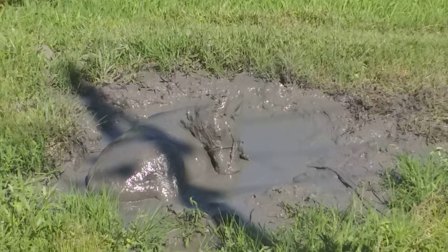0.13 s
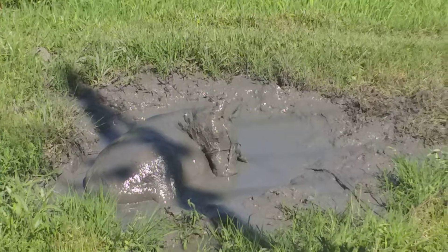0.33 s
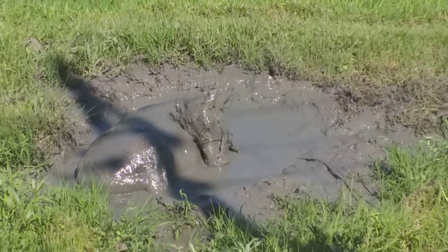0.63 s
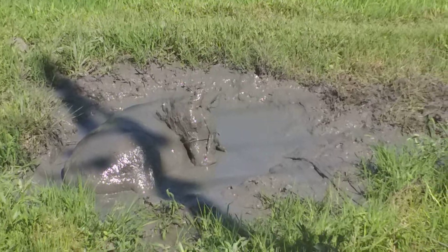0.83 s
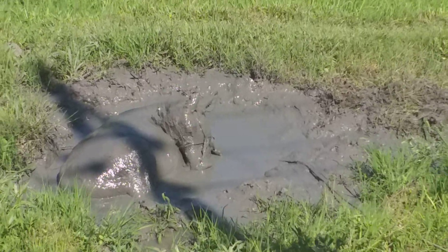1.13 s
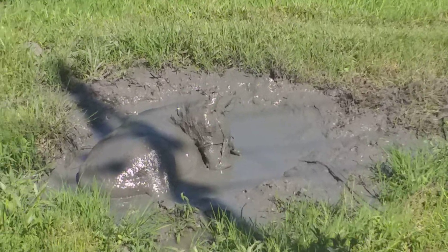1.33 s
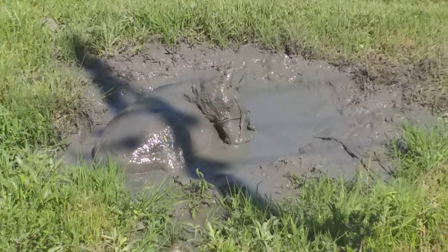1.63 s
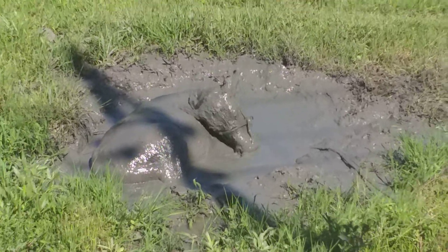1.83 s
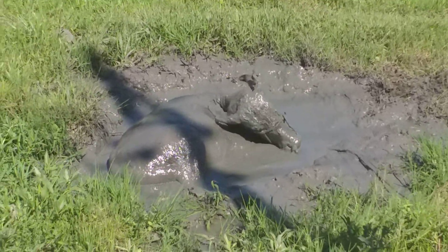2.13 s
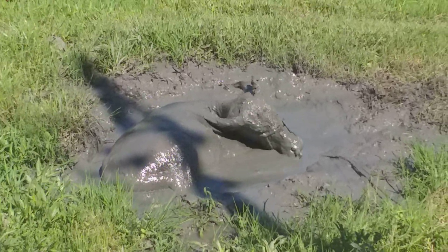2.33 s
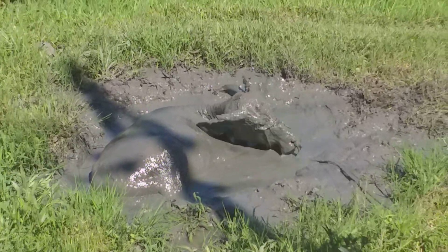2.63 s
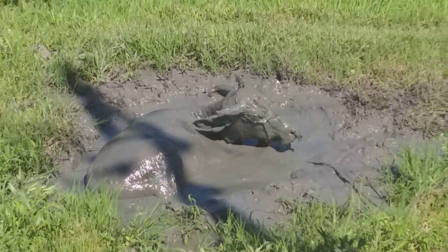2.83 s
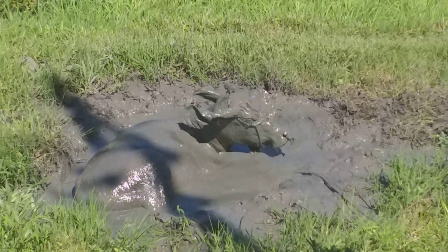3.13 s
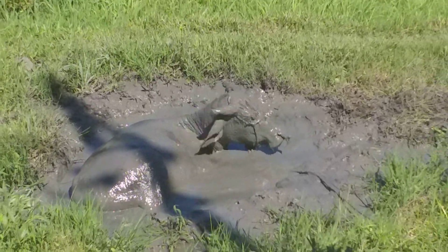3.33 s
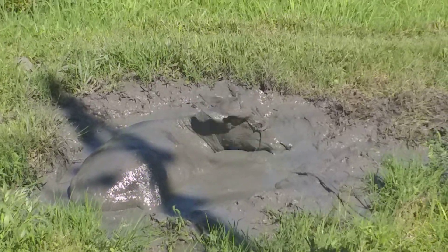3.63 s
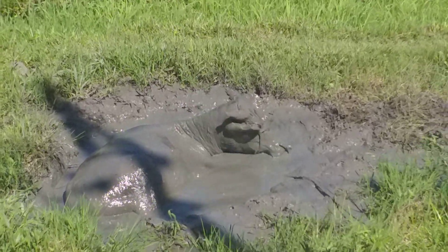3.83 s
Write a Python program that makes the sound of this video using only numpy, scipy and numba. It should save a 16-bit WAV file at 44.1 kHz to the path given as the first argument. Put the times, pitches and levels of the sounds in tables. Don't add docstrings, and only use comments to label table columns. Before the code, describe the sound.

Wind rumbles and slaps against a small camera microphone outdoors. Fluttering puffs fill 0-0.45 s, with isolated thumps near 0.7 and 1 s and quiet gaps between. From 1.4 to 2.05 s a harsh, brighter gust overloads with crackles; uneven low buffets continue to 4 s, pausing near 3.5. Faint katydid phrases buzz until 1.25 s, cricket chirps come near 0.1-0.4 and 3-3.5 s, over faint hiss and distant frogs.

```python
import sys
import numpy as np
from scipy import signal
from scipy.io import wavfile
from scipy.ndimage import uniform_filter1d, minimum_filter1d
from numba import njit

SR = 44100
rng = np.random.default_rng(int(sys.argv[2]) if len(sys.argv) > 2 else 0)


def voltage_ratio(level):
    return 10 ** (np.asarray(level, float) / 20)


def unload_wav(signal):
    wavfile.write(
        sys.argv[1],
        SR,
        np.round(np.clip(np.atleast_2d(signal).T, -1, 1) * 32767).astype(np.int16),
    )


N = 176400
MIC_LOW_HZ = 101.4


@njit
def svf(x, hz, k):
    low, band, b, l = np.empty(len(x)), np.empty(len(x)), 0., 0.
    for i in range(len(x)):
        g = np.tan(np.pi * hz[i] / SR)
        v = (b + g * (x[i] - l)) / (1 + g * (g + k))
        low[i], band[i] = l + g * v, k * v
        b, l = 2 * v - b, l + 2 * g * v
    return low, band


def band(x, hz, k):
    hz = np.full(N, 1. * hz)
    return svf(svf(x, hz, k)[1], hz, k)[1]


def highpass(x, hz):
    return signal.sosfilt(signal.butter(2, hz, "high", fs=SR, output="sos"), x)


def curve(table):
    return np.interp(np.arange(N) / SR, *np.array(table).T)


def unit(x):
    return x / np.sqrt(np.mean(x ** 2))


def walk(rate):
    levels = rng.standard_normal(size=2000)
    hold = SR / rate
    ramps = np.interp(np.arange(N) / hold, np.arange(len(levels)), levels)
    return unit(uniform_filter1d(ramps, int(hold / 2)))


def sweep(t, hz, fall_hz, length):
    u = np.clip(t / length, 0, 1)
    cycles = length * (hz * u - fall_hz * u ** 2.4 / 2.0)
    return np.sin(np.pi * u ** 0.65) * np.sin(2 * np.pi * cycles)


def airflow():
    # time in seconds, level in dB.
    breeze = [(0, -25.5), (.4, -27.5), (.53, -50.5), (.6, -37), (.92, -44.5), (1.02, -35), (1.11, -58),
              (1.17, -43.5), (1.28, -80), (1.35, -41.5), (1.4, -50), (1.45, -21), (2.0, -31.5), (2.1, -36),
              (2.47, -23.5), (2.52, -45), (2.6, -31), (4, -34)]
    # start in seconds, peak in dB, brightness in dB, length in
    # seconds.
    puffs = [(-0.003, -8, -17, 0.018), (0.042, -13, -24, 0.043), (0.063, -5.5, 12, 0.011),
             (0.088, -11.5, -24.5, 0.051), (0.12, -14.5, -29, 0.028), (0.153, -18, -3, 0.013),
             (0.181, -7, -25, 0.016), (0.21, -8.5, 24, 0.016), (0.26, -4.5, -33, 0.0045),
             (0.312, -8.5, -39.5, 0.029), (0.393, -5.5, -34.5, 0.02), (0.43, -10.5, -44, 0.0095),
             (0.696, -10.5, -41, 0.022), (0.74, -8.5, -29.5, 0.026), (0.788, -0.5, -28.5, 0.0052),
             (0.987, -13.5, -37.5, 0.01),
             (1.425, -6.5, -36, 0.036), (1.457, 2, -8, 0.0086), (1.475, -2.5, 5, 0.013),
               (1.493, 0.5, -27, 0.017), (1.513, -2.5, 1, 0.016), (1.527, -4.5, 46, 0.026),
               (1.545, -5, -9, 0.016), (1.576, -6.5, -7, 0.0089), (1.6, 7.5, 6, 0.0025),
               (1.611, -2.5, 10, 0.011), (1.634, 2.5, -10, 0.003), (1.665, -1.5, 8, 0.0037),
               (1.684, 2, 17, 0.0052), (1.707, -3.5, 20, 0.0092), (1.737, -2, -7, 0.01),
               (1.763, -10.5, 5, 0.01), (1.784, -9, 19, 0.017), (1.812, -7, -22, 0.045),
               (1.841, -5.5, -17, 0.034), (1.871, 3, -20, 0.0044), (1.91, 1.5, 8, 0.011),
               (1.932, -2, 5, 0.014), (1.947, -4, 4, 0.016), (1.971, -3.5, 3, 0.02),
               (1.984, -6.5, -29, 0.026), (2.024, -4.5, 77, 0.012),
             (2.086, -5.5, -38, 0.023), (2.148, -3.5, -8, 0.0045), (2.209, -8, -0.5, 0.0054),
               (2.238, 0.5, -22, 0.0043), (2.273, -6.5, -12, 0.0066), (2.302, -1.5, 16, 0.0031),
               (2.366, -12, -7, 0.038), (2.382, 0, -25, 0.0069), (2.439, -6, -14, 0.0099),
               (2.478, -8, -34, 0.0057), (2.56, -5, -30, 0.004), (2.573, -11.5, -16, 0.014),
               (2.601, -14, -12, 0.027), (2.643, -5, -38, 0.0056), (2.663, -6.5, -30, 0.012),
               (2.68, -5, -32, 0.018), (2.726, -18, -25, 0.024), (2.796, -14, -17, 0.028),
               (2.825, 0.5, -42, 0.013), (2.856, -6.5, -22.5, 0.013), (2.882, -9.5, -11, 0.013),
               (2.922, -7, -25, 0.0051), (2.974, -12.5, -19.5, 0.0057), (3.007, -12.5, -35, 0.008),
             (3.101, -9.5, -11, 0.017), (3.125, -5, -28, 0.0066), (3.212, -14.5, -37, 0.056),
               (3.238, -3.5, -15, 0.0061), (3.26, -23, -10, 0.042), (3.297, -15.5, -47, 0.036),
               (3.331, -10, -7.5, 0.033), (3.351, -6, -12, 0.028), (3.383, -3, -28, 0.016),
               (3.426, -18, -37, 0.013), (3.451, -15, -30.5, 0.022), (3.49, -12, -56, 0.0071),
               (3.585, -12.5, -25, 0.033), (3.612, -16.5, -13, 0.021), (3.632, -7, -18, 0.013),
               (3.652, -6, -12, 0.016), (3.686, -7.5, -26, 0.0069), (3.712, -9.5, -19, 0.012),
               (3.726, -6.5, -22, 0.012), (3.845, -11.5, -53, 0.0064), (3.867, -13.5, -34, 0.011),
               (3.907, -6.5, -31, 0.031), (3.962, 0.5, -29.5, 0.0064), (3.99, -11, -15, 0.017)]
    attack_s, release_s, puff_db, breeze_db = 0.0038, 0.0073, -5.5, 4
    breeze_eddy_hz, eddy_hz, octaves_per_db = 338, 1660, .05
    lull_s, lull_db = 3.535, 25

    t = np.arange(N) / SR
    level = curve(breeze)
    lull = voltage_ratio(-2 * lull_db * np.exp(-((t - lull_s) / 0.035) ** 4))
    power = lull * voltage_ratio(2 * (level + breeze_db + 2.54 * walk(25.06)))
    weighted_octave = power * (np.log2(breeze_eddy_hz) + 0.052 * (level + 30))
    for s, db, bright_db, length in puffs:
        span = slice(max(int((s - .01) * SR), 0), int((s + .15) * SR))
        u = t[span] - s
        rise = 1 / (1 + np.exp(-4 * u / attack_s))
        shape = rise / (1 + np.exp((u - length) / release_s)) ** 2
        puff = voltage_ratio(2 * (db + puff_db)) * shape
        octave = np.log2(eddy_hz * (0.72 + 0.98 * shape) ** 0.23) + octaves_per_db * min(bright_db, 3)
        power[span] += puff
        weighted_octave[span] += puff * octave
    return power, weighted_octave / power


def wind():
    flutter_db, flutter_rate, flutter_octaves_per_db = 2.5, 330, .13
    snap_rate, snap_db = 300, -8.5
    knee_hz = 260
    even, even_s = 0.5, .012

    power, octave = airflow()
    flutter = flutter_db * 2 * np.tanh(walk(flutter_rate) / 1.25)
    hz = np.clip(2 ** (octave + flutter_octaves_per_db * flutter), 60, 12000)
    snaps = (rng.random(N) < snap_rate / SR) * rng.standard_normal(N)
    push = rng.standard_normal(N) + voltage_ratio(snap_db) * unit(snaps)
    air = signal.lfilter([1], [1, -np.exp(-2 * np.pi * knee_hz / SR)], push)
    air = svf(unit(air), hz, 1.44)[0]
    air = svf(air, hz * 2, 1.55)[0]
    air = svf(air, np.minimum(hz * 3.5, 15000), 1.2)[0]
    air = highpass(air, MIC_LOW_HZ)
    air = air / (uniform_filter1d(air ** 2, int(even_s * SR)) + 1e-4) ** (even / 2)
    return air * np.sqrt(power) * voltage_ratio(flutter)


def frogs():
    frog_hz, width_hz, level_db, swell_s, swell_db = 2150, 450, 6, 1.25, 5
    chorus = unit(band(rng.standard_normal(N), frog_hz, width_hz / frog_hz))
    swell = swell_db * np.exp(-((np.arange(N) / SR - swell_s) / 0.25) ** 2)
    return chorus * voltage_ratio(level_db + 2.0 * walk(26) + swell)


def meadow():
    # time in seconds, level in dB.
    ducking = [(0, -70), (1.4, -68), (2.1, -74), (2.8, -77), (3.5, -75), (3.7, -71.5), (4, -72.5)]
    # frequency in Hz, level in dB per third octave.
    spectrum = [(70, 6.5), (170, 1.5), (600, -12.5), (1300, -9.5), (4300, -2.5), (5800, -14), (7700, -7),
                (9300, -14.5)]
    hiss_db, air_db = 21.5, 2.5

    hiss, swell = 0, walk(0.34)
    table_hz, table_db = np.array(spectrum).T
    for hz in 60 * 2 ** np.arange(0, 7.4, .25):
        db = np.interp(np.log(hz), np.log(table_hz), table_db) + swell + 1.5 * walk(2.7)
        hiss = hiss + voltage_ratio(db) * unit(band(rng.standard_normal(N), hz, .22))
    air = voltage_ratio(air_db) * unit(band(rng.standard_normal(N), 13500, .6))
    return voltage_ratio(curve(ducking)) * (voltage_ratio(hiss_db) * unit(hiss) + air + frogs())


def katydid():
    first_end_s, phrase_gap_s, phrase_s, stroke_rate = .039, .1109, .09, 142.5
    buzz_hz, fall_hz, level_db, swell_db = 9500, 1000, -57.5, 3
    t = np.arange(N) / SR
    back = (first_end_s - t) % phrase_gap_s
    on = (back < phrase_s) & (t < first_end_s + 11 * phrase_gap_s)
    strokes = sweep(-back % (1 / stroke_rate), buzz_hz + 70 * walk(60), fall_hz, .75 / stroke_rate)
    return on * strokes * voltage_ratio(level_db - swell_db * back / phrase_s + 1.2 * walk(80))


def swing(v):
    return 3.08 * v / (1 + v ** 2) ** 2


def slaps():
    # time in seconds, peak in dB, rise in milliseconds.
    slap_rows = [(0.0632, -5.5, 0.31), (0.0693, -9.5, 0.31), (0.1243, -9.5, 0.46), (0.1613, -14.5, 0.38),
                 (0.1951, -11.5, 0.27), (0.2103, -13.5, 0.4), (0.2229, -6.5, 0.35), (0.2747, -15, 0.42),
                 (0.7021, -14.5, 0.22), (0.7454, -11.5, 0.25), (0.9912, -13.5, 0.57), (1.4294, -12, 0.33),
                 (1.4596, -14.5, 0.16), (1.478, -6.5, 0.14), (1.4954, -4.5, 0.29), (1.5157, -11, 0.2),
                 (1.5307, -4, 0.36), (1.5388, 8, 0.36), (1.5494, -7, 0.25), (1.5589, -2.5, 0.42),
                 (1.5705, -3, 0.37), (1.5804, -7, 0.19), (1.6033, -5, 0.38), (1.6135, 4, 0.29),
                 (1.6273, -5, 0.31), (1.6658, -10.5, 0.18), (1.6905, 0, 0.22), (1.6979, -4.5, 0.33),
                 (1.7085, -4, 0.21), (1.7179, -20, 0.17), (1.7405, -4.5, 0.18), (1.768, -7.7, 0.54),
                 (1.785, -6.5, 0.24), (1.794, -8.5, 0.52), (1.822, -17, 0.22), (1.8448, -8.6, 0.19),
                 (1.8795, -5.5, 0.23), (1.9125, -17, 0.13), (1.9359, -3.5, 0.27), (1.9476, -2, 0.47),
                 (1.964, -8.5, 0.21), (1.975, 0, 0.19), (2.0275, 3, 0.17), (2.0348, -11, 0.2),
                 (2.094, -13, 0.4), (2.1515, -11, 0.29), (2.2426, -12.5, 0.18), (2.2835, -11, 0.37),
                  (2.3065, -5.5, 0.24), (2.3873, -3, 0.34), (2.574, -13.5, 0.35), (2.61, -20, 0.3),
                  (2.6806, -11, 0.4), (2.8299, -15.5, 0.38), (2.8763, -17.5, 0.27), (2.8835, -15.5, 0.39),
                  (2.9244, -15, 0.35), (3.113, -12.5, 0.3), (3.2612, -13, 0.26), (3.3527, -4.5, 0.26),
                  (3.3632, -6, 0.23), (3.3716, -10, 0.4), (3.387, -10.5, 0.27), (3.6138, -18.5, 0.31),
                  (3.6299, -11.5, 0.38), (3.6562, -14, 0.19), (3.6687, -10, 0.28), (3.6872, -12, 0.42),
                  (3.6988, -15, 0.36), (3.7275, -8, 0.48), (3.9125, -5.5, 0.505), (3.922, -8.5, 0.41),
                  (3.9336, -1.5, 0.56), (3.976, -14.1, 0.34)]
    slap_db, rebound_db, rebound_rises = 0.5, -9, 4.52

    out, table = np.zeros(N), slap_rows
    chance = rng.random((len(table), 3))
    for (s, db, rise_ms), (sign, late, size) in zip(table, chance):
        span = slice(int((s - .02) * SR), int((s + .02) * SR))
        u = (np.arange(N)[span] / SR - s) / (rise_ms * 1e-3)
        rebound = swing((u - rebound_rises * (0.628 + late)) / 1.19) * voltage_ratio(rebound_db) * (.5 + size)
        run_up = voltage_ratio(rebound_db) * late * swing(u + rebound_rises * (1 + size))
        out[span] += np.sign(sign - .5) * voltage_ratio(db + slap_db) * (swing(u) - rebound - run_up)
    return out


def cricket():
    # start in seconds, level in dB, number of syllables.
    chirps = [
        (.116, -51, 3),
        (.312, -52, 3),
        (2.954, -55.5, 4),
        (3.18, -55.5, 3),
        (3.376, -55, 3),
    ]
    syllable_s, sweep_s, song_hz, fall_hz, first_db = .0302, .024, 5350, 1200, -7

    t, out = np.arange(N) / SR, np.zeros(N)
    for s, db, count in chirps:
        for k in range(count):
            first = k == 0
            syllable = sweep(t - s - k * syllable_s, song_hz - 250 * first, fall_hz, sweep_s)
            out += voltage_ratio(db + first_db * first) * syllable
    decay = np.exp(-np.arange(1500) / (.012 * SR))
    echo = rng.standard_normal(1500) * decay * voltage_ratio(-27)
    return out + signal.fftconvolve(out, echo)[:N]


def cracks():
    # time in seconds, level in dB.
    spits = [
        (1.614, -22),
        (1.666, -24),
        (1.709, -19),
        (1.951, -27),
        (1.975, -25),
        (2.027, -18),
    ]
    t = np.arange(N) / SR
    gate = sum(voltage_ratio(db) * np.exp(-((t - s) / .001) ** 2) for s, db in spits)
    return band(gate * rng.standard_normal(N), 12700, .36)


def scene():
    port_hz, port_width_hz, port_boost_db = 1850, 1700, -14.5
    port_side_db, treble_side_db = -14, -23.5
    mid = wind() + meadow() + katydid() + slaps() + cricket() + cracks()
    port = band(mid, port_hz, port_width_hz / port_hz)
    mid = mid + voltage_ratio(port_boost_db) * port
    side = voltage_ratio(port_side_db) * port + voltage_ratio(treble_side_db) * band(np.roll(mid, 40), 9000, .8)
    return np.array([mid + side, mid - side])


def top_cut(x):
    return signal.sosfilt(signal.butter(12, 15800, fs=SR, output="sos"), x)


def record(dry):
    top_hz, limit, limit_s, clip, knee = 9700, 1.15, .002, 1.0, 8
    x = highpass(dry, 0.8 * MIC_LOW_HZ)
    dull = signal.sosfiltfilt(signal.butter(6, top_hz, fs=SR, output="sos"), x)
    x = .9 * dull + .1 * x
    gain = np.minimum(limit / (np.abs(x).max(axis=0) + 1e-9), 1)
    gain = minimum_filter1d(gain, int(limit_s * SR))
    x = x * uniform_filter1d(gain, int(limit_s * SR))
    x = x / (1 + np.abs(x / clip) ** knee) ** (1 / knee)
    return top_cut(x)


dry = scene()
out = record(dry)
unload_wav(out)
```